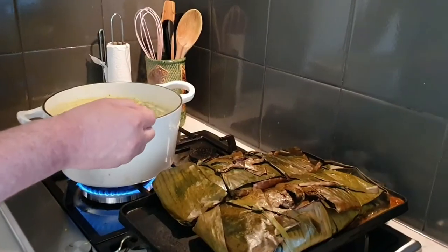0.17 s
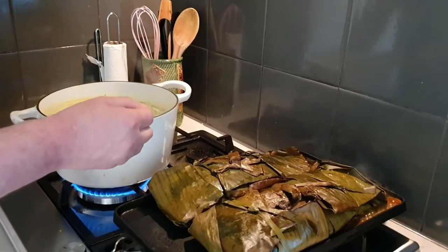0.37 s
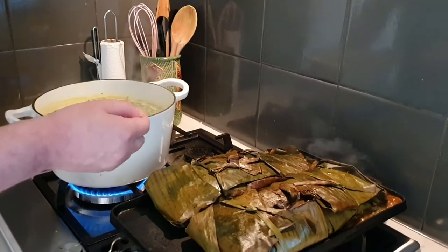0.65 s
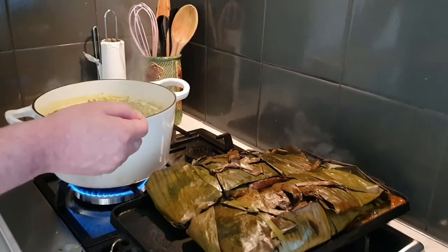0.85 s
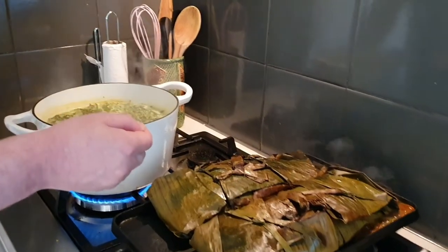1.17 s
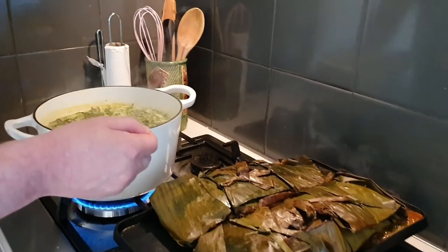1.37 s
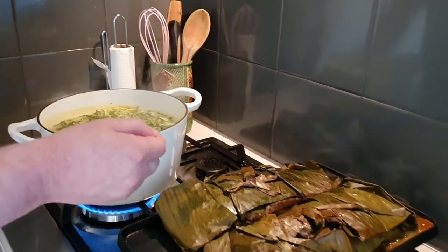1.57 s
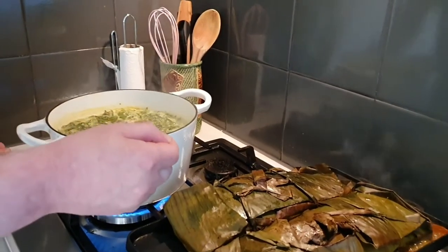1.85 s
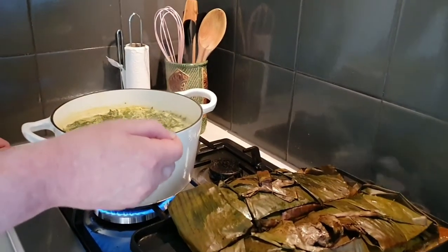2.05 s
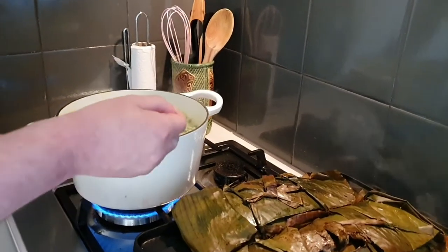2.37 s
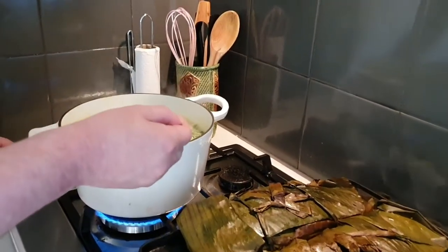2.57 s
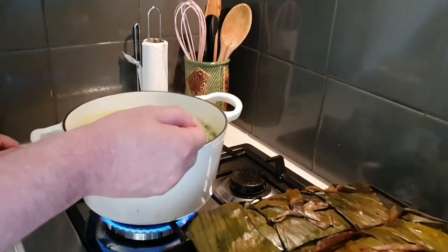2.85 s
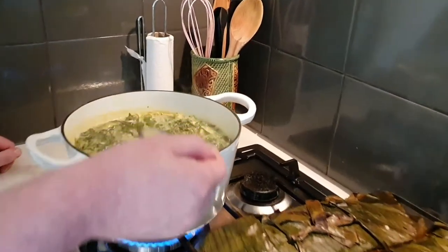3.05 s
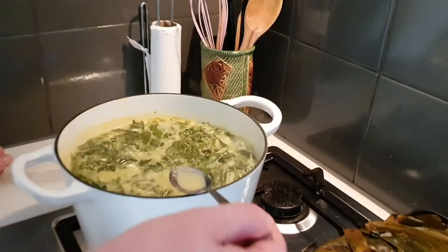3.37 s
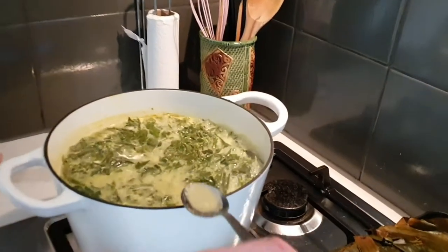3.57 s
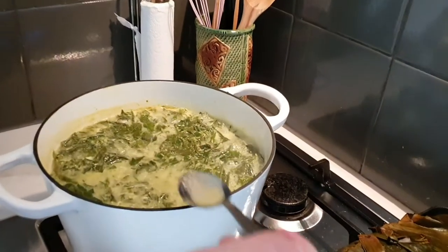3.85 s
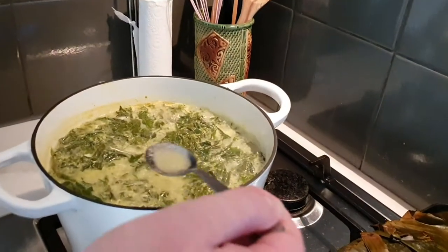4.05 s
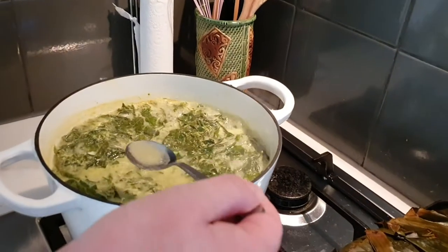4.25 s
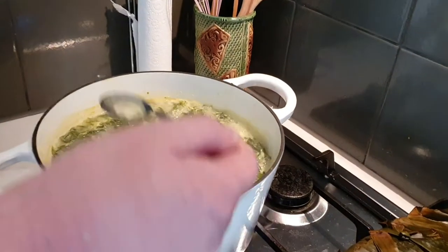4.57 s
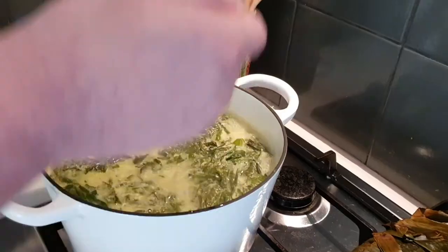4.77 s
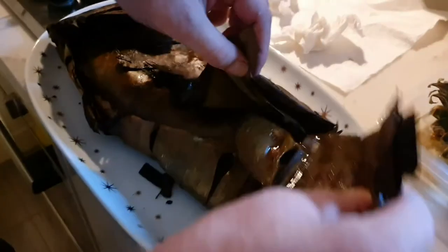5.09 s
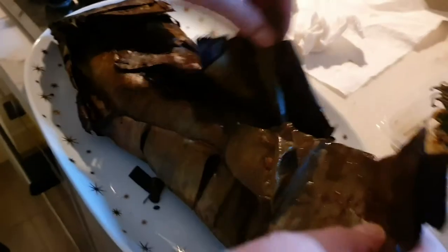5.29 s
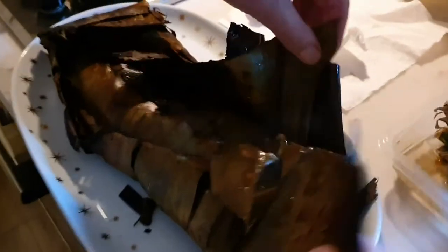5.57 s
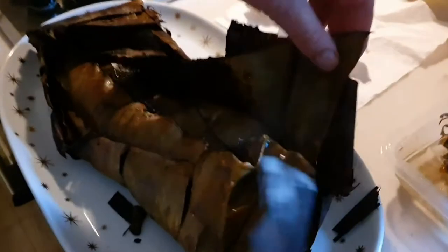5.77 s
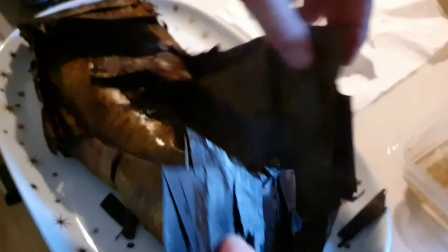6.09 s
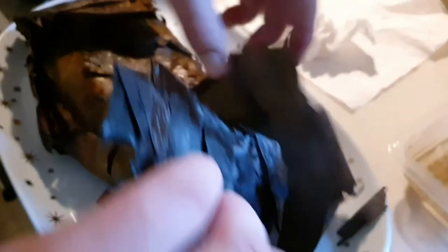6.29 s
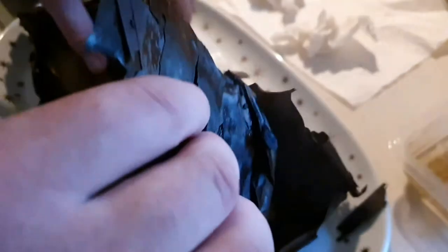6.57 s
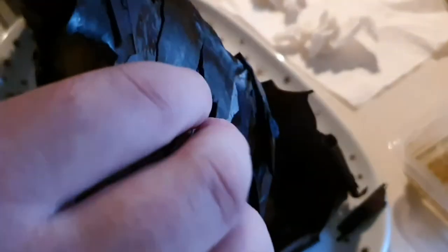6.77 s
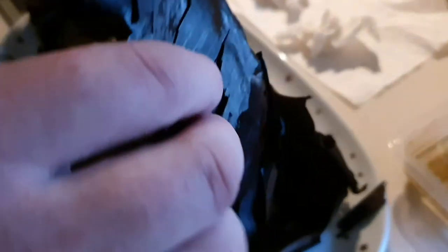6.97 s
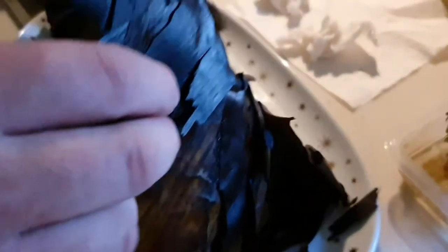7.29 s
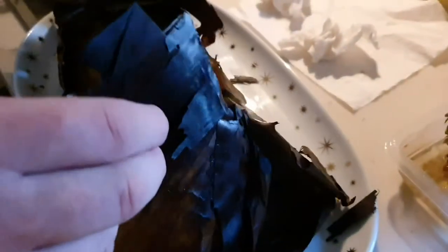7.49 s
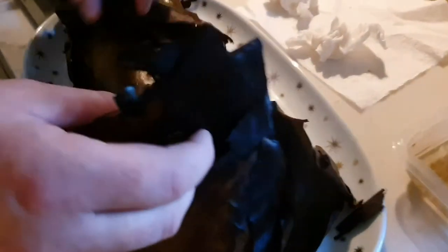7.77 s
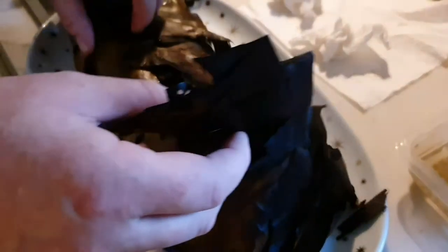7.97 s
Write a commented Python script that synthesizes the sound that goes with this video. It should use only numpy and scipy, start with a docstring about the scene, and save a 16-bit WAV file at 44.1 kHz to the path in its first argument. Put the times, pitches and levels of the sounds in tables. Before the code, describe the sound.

In a small tiled kitchen, a pot simmers softly over a gas flame. Close to the stereo microphones a hollow plastic bowl tumbles in quick bounces, slams hard, then rocks in ever faster, softer taps. The sizzle grows nearer, with light spoon ticks and a dull cupboard knock, then fades away. Fingers peel crisp baked leaves, crackling, scraping and snapping, close and slightly left.

```python
"""In a tiled kitchen, stew simmers over a gas flame: shaped noise for the flame, bursts of clicks for bubbles.
Near the pair of microphones something hollow, probably a plastic bowl, tumbles, slams down and wobbles to rest;
a spoon ticks and something like a cupboard door shuts, all as contact forces driving resonances. The kitchen
sounds fade to silence and the scene changes: fingers peel crisp baked leaves off a parcel of food: cracks,
slips and snaps, with a faint hum. Most of the sound sits a little to the left."""
import sys
import numpy as np
from scipy import signal
from scipy.fft import rfft, irfft, next_fast_len
from scipy.io import wavfile

SR = 44100
rng = np.random.default_rng(int(sys.argv[2]) if len(sys.argv) > 2 else 0)


def digitize_waveform(pressure):
    """Quantize a signal to 16-bit integers and store it at the path in sys.argv[1].

    Rows of a 2-D input are taken as channels; values are limited to [-1, 1].
    """
    field = np.atleast_2d(pressure).T
    bounded = np.clip(field, -1, 1)
    quanta = np.round(bounded * 32767).astype(np.int16)
    wavfile.write(sys.argv[1], SR, quanta)


N = 358533
TIME = np.arange(N) / SR

# Bowl bounces: t/s, body level/dB, boom f/Hz, boom level/dB, contact hardness/dB, treble ring f/Hz
BOUNCES = [(0.05, -46, 450, -72, 6, 5370), (0.613, -20.5, 300, -27, -3.5, 7140),
           (0.716, -20.5, 386, -26, -11.5, 7300), (0.789, -40.5, 332, -33, -2.5, 7140),
           (0.873, -22.5, 506, -28, -2.5, 10300), (0.907, -22, 441, -23.5, -2.5, 5330),
           (0.949, -34.5, 377, -50, -22, 5230), (1.071, -31, 290, -36, 11.5, 7700),
           (1.114, -31.5, 301, -31.5, -11.5, 5230), (1.204, -30, 331, -29, -2.5, 10330),
           (1.26, -28.5, 293, -36, 0, 5400), (1.343, -26, 319, -32, -7.5, 5440),
           (1.406, -28, 280, -27.5, -8.5, 5100), (1.577, -30.5, 310, -31, -9, 6420),
           (1.653, -30.5, 302, -28, -6.5, 6420)]
# Bowl resonances: f/Hz, width/Hz, level/dB
BOWL = [(292, 23, -13.5), (494, 110, -8), (687, 98, -7), (740, 48, -6.5), (1060, 540, -12), (1315, 88, -3),
        (1616, 180, -13), (2120, 140, -12), (2420, 85, -12.5), (3650, 3600, -20), (5090, 91, -8.5),
        (5960, 500, -31), (6200, 34, -11.5), (6900, 240, -16.5), (8000, 90, -27.5), (8870, 1400, -28.5),
        (10400, 400, -14.5), (11000, 400, -21.5), (12500, 1300, -27)]
# Resonances of the hard landing: f/Hz, width/Hz, level/dB
LANDING = [(80, 31, -1), (115, 95, -2.5), (188, 12, 12), (290, 71, 0), (409, 40, -3), (506, 39, -4),
           (700, 200, -10), (1190, 400, -5.5), (2400, 30, -12.5), (2616, 38, -4), (2850, 1800, -9),
           (3020, 78, -6), (3470, 17, -4), (3870, 410, -2), (4580, 58, -5), (5000, 34, -3),
           (5060, 1400, -13.5), (6570, 320, -6.5), (11700, 6400, -10)]
# Hard landing: level/dB of the boom, body, clack, click and top ranges
SLAM_DB = [-21.5, -22, -20.5, -18.5, -25]
# Range limits of the hard landing: f/Hz
SLAM_EDGES_HZ = [40, 400, 1000, 2800, 7500, 17000]
# Range limits of bounces, taps and knocks (boom, body, clack, click): f/Hz
BLOW_EDGES_HZ = [40, 400, 1000, 2800, 17000]
# First wobble tap, rows boom, body, clack, click: level/dB, loss/(dB per dB that the gap shrinks)
TAP_RANGES = [(-31.5, 0.7), (-34.5, 1.2), (-28, 2.5), (-36.5, 3)]
# Short rolls on the rim: t/s, length/s, boom f/Hz, boom level/dB, rattle level/dB
ROLLS = [(1.96, .11, 299.7, -38, -50), (2.126, 0.044, 297, -46, -54), (2.184, 0.13, 302.4, -37.5, -47),
         (2.391, 0.024, 303, -58, -62), (2.471, 0.066, 208.2, -44, -66)]
# Soft low bumps: t/s, level/dB, f/Hz
BUMPS = [(1.423, -27.5, 99.4), (3.639, -29.5, 65), (3.705, -37, 60), (6.343, -46.5, 51), (7.515, -43.5, 48)]

# Hands at the parcel, how busy: t/s, level/dB
HANDLING = [(4.84, -25), (5.07, -5), (5.3, -6.5), (5.48, -12), (5.8, -0.5), (6.15, -1), (6.7, 2),
            (7.85, 2.5), (8.13, -3.5)]
# A leaf is bent and crinkles: t/s, length/s, level/dB
BENDS = [(5.245, 0.036, -52), (5.8, .1, -50), (5.985, 0.031, -56), (6.35, 0.095, -59.5),
         (6.655, 0.068, -53), (6.93, 0.051, -54.5), (7.18, 0.053, -43), (7.555, 0.05, -45),
         (7.69, 0.087, -50), (7.88, 0.028, -69)]
# A leaf slides over the parcel: t/s, length/s, scrape level/dB, soft rub level/dB
SLIDES = [(5.517, 0.02, -59, -67), (5.809, 0.079, -65, -59), (6.247, .03, -66, -70), (6.334, .1, -71, -58),
          (6.612, 0.039, -51, -63), (6.85, 0.048, -49, -76), (7.205, 0.026, -38, -43),
          (7.527, 0.085, -48.5, -42.5), (7.642, 0.09, -51.5, -44), (8.121, .03, -52, -42)]
# Leaf fibres snapping: t/s, level/dB, brightness/dB, length of the tear/s
SNAPS = [(4.951, -60.5, -1, .002), (5.063, -52, -4.5, 0.0023), (5.2, -56, -4.5, 0.0018),
         (5.311, -48.5, -2.5, 0.0023), (5.559, -57, 0, .001), (5.655, -62.5, 7, 0.0015),
         (5.746, -49, 2.5, 0.0011), (5.823, -42.5, 2, 0.005), (6.007, -43.5, 0.5, 0.00029),
         (6.101, -54, 5, .003), (6.243, -52.5, -7.5, .001), (6.328, -60.5, -3, .002),
         (6.631, -58.5, 1, 0.00086), (6.682, -66, 8, .002), (6.755, -59.5, 7.5, 0.0028),
         (6.835, -52, 6.5, .001), (6.904, -49, 0, .002), (7.013, -50, 2, 0.0063), (7.105, -42, -2.5, 0.012),
         (7.173, -52, -9, 0.0018), (7.217, -51.5, -16, 0.0027), (7.477, -53, 1.5, 0.00065),
         (7.546, -51, -4, .002), (7.719, -38, -2.5, 0.00083), (7.834, -50.5, -2, .001),
         (7.897, -54.5, -7, 0.00055), (7.921, -63, 7, .001), (7.989, -61, -7, .001), (8.033, -55, -5, .001)]
# Balance of a snap in low, middle and top treble: level/dB
SNAP_BALANCE_DB = [-8.5, -0.5, -5.5]
# Range limits of snaps and spoon ticks: f/Hz
SNAP_EDGES_HZ = [600, 2800, 7500, 17000]
# Leaf resonances: f/Hz, width/Hz, level/dB
LEAF = [(1460, 560, -0.5), (2460, 700, -3), (3670, 440, 1), (6260, 770, -1.5), (10200, 3100, -8),
        (14900, 1600, -14)]
# Spectrum of leaves scraping: f/Hz, level/(dB per Hz)
SCRAPING = [(400, -12.5), (680, 5.5), (950, 5.5), (1300, 0), (1700, -4.5), (3000, -5.5), (7000, -26)]
# Spectrum of leaves rubbing softly: f/Hz, level/(dB per Hz)
RUBBING = [(100, -6), (150, 6), (220, -1), (350, 1), (560, -3.5), (800, -6), (2000, -42)]

# Cupboard door knocks: t/s, level/dB, boom level/dB
KNOCKS = [(4.12, -42.5, -61), (4.168, -29, -38.5)]
# Cupboard resonances: f/Hz, width/Hz, level/dB
CUPBOARD = [(126, 35, -3), (210, 79, -1), (366, 390, -9.5), (537, 190, -8.5), (835, 180, -13),
            (1140, 300, -12), (1770, 1350, -18), (3700, 1300, -51)]
# Spoon ticks: t/s, level/dB, ring f/Hz, brightness/dB
TICKS = [(3.267, -35, 3260, -2.5), (3.348, -59.5, 2900, -19), (3.601, -48.5, 2640, -11)]
# Balance of a tick in low, middle and top treble: level/dB
TICK_BALANCE_DB = [-5.5, -0.5, -3.5]
# Spoon resonances: f/Hz, width/Hz, level/dB
SPOON = [(1570, 610, -3), (2160, 200, -12), (3230, 390, -0.5), (4460, 440, 7), (5700, 290, 5),
         (9450, 4000, -21)]

# How near the stove is: t/s, level/dB
NEARNESS = [(0, -7.5), (.5, -4.5), (2.5, -5), (2.85, -2.5), (3.15, -0.5), (3.6, 1.5), (4.05, -2)]
# Spectrum of the gas flame: f/Hz, level/(dB per Hz)
FLAME = [(110, -26.5), (190, -2.5), (290, 4.5), (430, -3.5), (750, -1.5), (1000, -2.5), (1500, -23),
         (3000, -28)]
# Spectrum of the bubbling stew: f/Hz, level/(dB per Hz)
SIZZLE = [(700, -26.5), (1050, -3), (1400, 6.5), (1900, 0), (2500, -0.5), (3500, 2.5), (5500, 0),
          (8000, -4.5), (12500, -3.5), (16000, -12.5)]
# Spectrum of the low rumble of stove and hands: f/Hz, level/(dB per Hz)
RUMBLE = [(20, -36), (35, -5.5), (50, 4), (80, 3.5), (115, 2), (160, -9), (260, -45)]
# Faint electric hum: f/Hz, level/dB
HUM = [(393.0, -76.5)]
# Diffuse sound at the two microphones: f/Hz, likeness (1 alike, 0 unrelated)
LIKENESS = [(50, 1), (130, 0.97), (280, 0.91), (520, 0.72), (1000, 0.079), (3000, -0.076), (15000, -0.13)]

SLAM_S = 1.422
CLACK_DB, CLICK_DB = -3.5, -6   # against the body
CLACK_FOLLOWS = 0.32   # share of the hardness that reaches the clack
RING_WIDTH_HZ, RING_DB = 220, -13
FLEX_HZ, FLEX_RISE_HZ = 1279, 654.6   # where the chirp settles; how far above it starts
FLEX_SAG_S, FLEX_SWELL_S = .012, .016
FLEX_DB = -6.5   # against the level passed to each chirp
RIM_BOOM_BELOW_HZ = 325   # lower booms mark a landing on the rim
# Every gap between taps is a fixed share of the last
WOBBLE_START_S, FIRST_GAP_S, GAP_SHARE = 1.722, .055, .87
CYCLES_PER_TOUCH = 4
ATTACK_S, RELEASE_S = 0.011, 0.035   # of every stroke and roll
# Between the strokes, before HANDLING is added; the rumble has no strokes
CRINKLE_DB, SCRAPE_DB, RUB_DB, HAND_RUMBLE_DB = -61, -67, -64, -60
DOOR_CLACK_DB, DOOR_CLICK_DB = -5.5, -8.5   # against the knock
FLAME_DB, SIZZLE_DB, STOVE_RUMBLE_DB = -50, -48.5, -50   # before NEARNESS is added
SIZZLE_FOLLOWS = .75   # share of NEARNESS in dB that reaches the sizzle
KITCHEN_T60_S = 0.54
LEFT_LEAD_S = .00036   # direct sound reaches the left microphone first
MIC_SPREAD_S = .0006   # largest shift of an echo at either microphone
BOWL_LEFT_DB, OTHERS_LEFT_DB = 2.5, 3   # left over right
SILENT_AT_S, FADE_S, HANDS_FADE_IN_S = 4.82, 0.69, 0.038   # stove fades out, then the parcel fades in
CUTOFF_HZ = 16300


def bowl():
    """The bowl bounces, booming at a pitch set by how it lands, and slams down."""
    bounces = []
    for s, body_db, boom_hz, boom_db, hard_db, ring_hz in BOUNCES:
        clack_db = body_db + CLACK_DB + CLACK_FOLLOWS * hard_db
        click_db = body_db + CLICK_DB + hard_db
        modes = [(boom_hz, 45, 1.5)] + BOWL + [(ring_hz, RING_WIDTH_HZ, RING_DB)]
        bounces.append(blow(s, [boom_db, body_db, clack_db, click_db], modes, BLOW_EDGES_HZ,
                            contact_s=0.007, chatter=3.5, room_db=2.5, near_db=-1.5,
                            lead_s=LEFT_LEAD_S, scatter_db=1.0))
    slam = blow(SLAM_S, SLAM_DB, LANDING, SLAM_EDGES_HZ, contact_s=0.018, chatter=6.4, room_db=0.0,
                near_db=-3.0, lead_s=LEFT_LEAD_S, scatter_db=1.5, size=SR // 14)
    chirps = [flex(s, body_db) for s, body_db, boom_hz, *_ in BOUNCES if boom_hz < RIM_BOOM_BELOW_HZ]
    return blows(bounces) + blows(chirps) + blows([slam])


def wobble(count=10):
    """The bowl rocks on its rim in ever quicker, softer and duller taps."""
    gaps = FIRST_GAP_S * GAP_SHARE ** np.arange(count)
    starts = WOBBLE_START_S + np.cumsum(gaps) - gaps
    first_db, loss = np.transpose(TAP_RANGES)
    shrink_db = 20 * np.log10(gaps / FIRST_GAP_S)
    taps = list(zip(starts, first_db + loss * shrink_db[:, None]))
    modes = [(287, 45, 2.1)] + BOWL + [(6400, 64, -4)]
    knocks = blows(blow(s, levels_db, modes, BLOW_EDGES_HZ, contact_s=0.018, chatter=0.66, room_db=0.5,
                        near_db=-9.5, lead_s=LEFT_LEAD_S, scatter_db=3.5) for s, levels_db in taps)
    return knocks + blows(flex(s, clack_db + 9.5) for s, (_, _, clack_db, _) in taps)


def roll(s, length_s, boom_hz, boom_db, rattle_db):
    """The rim touches down every few cycles of the boom, keeping it going with a light rattle."""
    t = TIME[:SR // 2]
    touches = np.diff(np.floor(t * boom_hz / CYCLES_PER_TOUCH), prepend=-1) * stroke(t, length_s)
    boom_force = kitchen(touches, room_db=-3.0, near_db=1.0, lead_s=LEFT_LEAD_S)
    boom = resonate(boom_force, [(boom_hz, 40, 0)], scatter_db=0)
    rattle_force = kitchen(touches, room_db=1.0, near_db=11.0, lead_s=LEFT_LEAD_S)
    rattle = resonate(rattle_force, BOWL, scatter_db=7.0)
    parts = [(boom_db, band(boom, [150, 430])), (rattle_db, band(rattle, [520, 1350]))]
    size = int((length_s + RELEASE_S) * SR)
    return round(s * SR), sum(from_db(db) * part / part[:, :size].std() for db, part in parts)


def flex(s, db):
    """A landing on the rim stiffens the wall for a moment: its pitch falls as it springs back."""
    t = TIME[:SR // 8]
    hz = FLEX_HZ + FLEX_RISE_HZ * np.exp(-t / FLEX_SAG_S)
    hz = hz * from_db(.2 * rng.standard_normal())   # each landing a shade off in pitch
    swell = (t / FLEX_SWELL_S) ** 2 * np.exp(2 - 2 * t / FLEX_SWELL_S)
    cycles = np.cumsum(hz) / SR + rng.random((2, 1)) / 2   # a phase of its own at each microphone
    return round(s * SR), from_db(db + FLEX_DB) * swell * np.sin(2 * np.pi * cycles)


def bumps():
    """Soft low bumps, as sine waves that swell and die within a few cycles."""
    t = TIME[:SR // 3]
    swell = (t / 0.021) ** 2 * np.exp(2 - 2 * t / 0.023)
    return blows((round(s * SR), from_db(db) * swell * np.sin(2 * np.pi * hz * t)[None])
                 for s, db, hz in BUMPS)


def leaves():
    """Dry leaves rub and scrape as they slide, and crack in clumps as they bend, over a handling rumble."""
    busy = from_db(curve_db(HANDLING))
    crinkle = strokes(BENDS, from_db(CRINKLE_DB) * busy)
    scrape = strokes([(s, length_s, db) for s, length_s, db, _ in SLIDES], from_db(SCRAPE_DB) * busy)
    rub = strokes([(s, length_s, db) for s, length_s, _, db in SLIDES], from_db(RUB_DB) * busy)
    bending = from_db(0.95 * drift(30))
    cracks = 0
    for modes in (LEAF[:2], LEAF[2:4], LEAF[4:]):   # large and small flakes crack in clumps of their own
        clicks = grains(260 * bending * from_db(8.1 * drift(45)), spread_db=6.5)
        cracks = cracks + resonate(kitchen(clicks, room_db=5.0, near_db=1.0, lead_s=0), modes, scatter_db=0)
    slips = grains(1200 * from_db(6.2 * drift(40)), spread_db=4.0)
    slips = kitchen(slips, room_db=0.0, near_db=7.5, lead_s=0)
    friction = diffuse(N)
    rumble = from_db(HAND_RUMBLE_DB) * busy * colour(friction, RUMBLE)
    rubbing = colour(friction[:, ::-1], RUBBING)   # reversed, to be unlike the rumble
    return crinkle * rms_one(cracks) + scrape * colour(slips, SCRAPING) + rub * rubbing + rumble


def snaps():
    """Single fibres snap, each at its own pitch."""
    sounds = []
    for s, db, bright_db, tear_s in SNAPS:
        pitch = from_db(rng.uniform(-1.6, 2.4))   # frequency ratio, 0.83 to 1.32
        sounds.append(blow(s, db + tilted(SNAP_BALANCE_DB, bright_db), np.array(LEAF) * [pitch, 1, 1],
                           SNAP_EDGES_HZ, contact_s=tear_s, chatter=7.2, room_db=-2.0, near_db=-2.0,
                           lead_s=0, scatter_db=-1.0))
    return blows(sounds)


def utensils():
    """Dull cupboard knocks from across the room and light ticks of the spoon."""
    knocks = blows(blow(s, [boom_db, db, db + DOOR_CLACK_DB, db + DOOR_CLICK_DB], CUPBOARD, BLOW_EDGES_HZ,
                        contact_s=0.0023, chatter=1.0, room_db=10.5, near_db=-5.5,
                        lead_s=LEFT_LEAD_S, scatter_db=1.0, size=SR // 16)
                   for s, db, boom_db in KNOCKS)
    ticks = blows(blow(s, db + tilted(TICK_BALANCE_DB, bright_db), [(ring_hz, 90, 3.0)] + SPOON,
                       SNAP_EDGES_HZ, contact_s=.004, chatter=0.75, room_db=5.5, near_db=6.5,
                       lead_s=0, scatter_db=3.0)
                  for s, db, ring_hz, bright_db in TICKS)
    dull = signal.butter(2, 5500, fs=SR, output="sos")
    return signal.sosfilt(dull, knocks) + ticks


def stove():
    """The flame rumbles and rushes under thousands of tiny bursting bubbles."""
    near_db = curve_db(NEARNESS)
    bubbles = grains(3000 * from_db(2.5 * drift(23)), spread_db=5.5)
    bubbles = kitchen(bubbles, room_db=6.5, near_db=-2.0, lead_s=0)
    rush = from_db(FLAME_DB) * colour(diffuse(N), FLAME)
    rumble = from_db(STOVE_RUMBLE_DB) * colour(diffuse(N), RUMBLE)
    sizzle = from_db(SIZZLE_DB + SIZZLE_FOLLOWS * near_db) * colour(bubbles, SIZZLE)
    return from_db(near_db) * (rush + rumble) + sizzle


def hum():
    """An appliance hums faintly, a steady sine, near the worktop where the parcel lies."""
    present = np.interp(TIME, [4.84, 5.3], [0, 1])
    return present * sum(from_db(db) * rms_one(np.sin(2 * np.pi * hz * TIME)) for hz, db in HUM)


def blow(s, levels_db, modes, edges, contact_s, chatter, room_db, near_db, lead_s, scatter_db,
         size=SR // 50):
    """A click and a brief chatter drive the modes; each range's level is set over the first `size` samples."""
    t = TIME[:SR * 2 // 5]
    force = chatter * rng.standard_normal(len(t)) * np.exp(-t / contact_s) / np.sqrt(contact_s * SR / 2)
    force[0] += 1
    ringing = resonate(kitchen(force, room_db, near_db, lead_s), modes, scatter_db)
    ringing = tiles(ringing, echo_db=-15.0)
    parts = [band(ringing, pair) for pair in zip(edges, edges[1:])]
    return round(s * SR), sum(from_db(db) * part / part[:, :size].std() for db, part in zip(levels_db, parts))


def resonate(force, modes, scatter_db):
    """Parallel resonances; each point of contact excites them a little differently."""
    out = 0
    for k, (hz, width, level_db) in enumerate(modes):
        r = np.exp(-np.pi * width / SR)
        gain = (-1) ** k * from_db(level_db + scatter_db * rng.standard_normal()) * (1 - r * r) / 2
        poles = [1, -2 * r * np.cos(2 * np.pi * hz / SR), r * r]
        out = out + signal.lfilter([gain, 0, -gain], poles, force + 1e-18)
    return out


def kitchen(force, room_db, near_db, lead_s):
    """Direct sound, then diffuse sound following its energy: quick near reflections and the tiled room's tail."""
    energy = 0
    for t60, level_db in [(.05, near_db), (KITCHEN_T60_S, room_db)]:
        r = from_db(-120 / (t60 * SR))   # this energy falls 60 dB in t60
        energy = energy + signal.lfilter([0, 1 - r], [1, -r], (from_db(level_db) * force) ** 2 + 1e-18)
    late = np.pad(force, (int(abs(lead_s) * SR), 0))[:len(force)]
    return np.array([force, late]) + np.sqrt(energy) * diffuse(len(force))


def tiles(x, echo_db, count=6):
    """A few early echoes off tiles and worktop, each from its own direction, colour every blow in its own way."""
    out = x.copy()
    delays = rng.uniform(.001, .009, count) + MIC_SPREAD_S * rng.uniform(-1, 1, (2, count))
    for channel, lags in enumerate(np.maximum(delays * SR, 1).astype(int)):
        for k, lag in enumerate(lags):
            out[channel, lag:] += (-1) ** k * from_db(echo_db) * x[channel, :-lag]
    return out


def diffuse(size):
    """White stereo noise from all around: alike in the bass, nearly unrelated in the treble."""
    padded = next_fast_len(size)
    mid, side = rfft(rng.standard_normal((2, padded)))
    alike = np.clip(per_bin(LIKENESS, padded), -.99, .99)
    stereo = np.sqrt(1 + alike) * mid + np.sqrt(1 - alike) * side * [[1], [-1]]
    return irfft(stereo, padded)[:, :size]


def grains(per_s, spread_db):
    """Random clicks, mostly small and a few large."""
    sizes = from_db(spread_db * np.minimum(rng.exponential(1, N), 4)) * rng.choice([-1, 1], N)
    return sizes * (rng.random(N) < per_s / SR)


def drift(per_s):
    """Slow chance: straight lines between normal random values, `per_s` of them a second."""
    return np.interp(TIME * per_s, np.arange(4096), rng.standard_normal(4096))


def stroke(t, length_s):
    """Rise, hold, then die away."""
    return np.clip(t / ATTACK_S, 0, 1) * np.exp(-np.maximum(t - length_s, 0) / RELEASE_S)


def strokes(rows, between):
    """Gain of strokes (t/s, length/s, level/dB), their power added to that of the gain between them."""
    t = TIME[:SR // 2]
    power = blows((round(s * SR), (from_db(db) * stroke(t, length_s))[None] ** 2) for s, length_s, db in rows)
    return np.sqrt(between ** 2 + power[0])


def blows(sounds):
    """Lay out sounds at their starting samples."""
    out = np.zeros((2, N))
    for at, sound in sounds:
        out[:, at:at + sound.shape[1]] += sound[:, :N - at]
    return out


def colour(x, spectrum):
    """Weight a sound by a smooth spectrum; rms 1."""
    size = next_fast_len(N)
    shaped = rfft(x, size) * from_db(per_bin(spectrum, size))
    return rms_one(irfft(shaped, size)[..., :N])


def per_bin(points, size):
    """A table over log frequency, read at the bins of a transform."""
    hz, value = np.transpose(points)
    return np.interp(np.log(np.fft.rfftfreq(size, 1 / SR) + 1), np.log(hz), value)


def band(x, edges):
    """Keep one range of frequencies."""
    return signal.sosfilt(signal.butter(3, edges, "band", fs=SR, output="sos"), x)


def tilted(balance_db, brightness_db):
    """Brightness raises the top of three ranges and lowers the bottom one."""
    return np.array(balance_db) + brightness_db * np.array([-1, 0, 1])


def curve_db(points):
    """A level curve at every sample."""
    return np.interp(TIME, *np.transpose(points))


def from_db(db):
    """Decibels to gain."""
    return 10 ** (np.asarray(db) / 20)


def rms_one(x):
    """Scale to unit power."""
    return x / np.sqrt(np.mean(x ** 2) + 1e-20)


def placed(x, left_db):
    """All but the deep bass sits a little to the left."""
    bass = signal.sosfiltfilt(signal.butter(2, 90, fs=SR, output="sos"), x)
    return bass + (x - bass) * from_db(left_db / 2 * np.array([[1], [-1]]))


def scene():
    """The bowl clatters by the stove; stove and utensils fade out, then the leaves are unwrapped."""
    clatter = placed(bowl() + wobble() + blows(roll(*row) for row in ROLLS), BOWL_LEFT_DB)
    fade_out = np.clip((SILENT_AT_S - TIME) / FADE_S, 0, 1)
    cooking = fade_out * (utensils() + stove())
    fade_in = np.clip((TIME - SILENT_AT_S) / HANDS_FADE_IN_S, 0, 1)
    unwrapping = fade_in * (leaves() + snaps() + hum())
    return clatter + placed(cooking + unwrapping, OTHERS_LEFT_DB) + bumps()


def record(dry):
    """The highest peaks are rounded and the top is cut steeply."""
    rounded = 1.1 * np.tanh(dry / 1.1)
    return signal.sosfilt(signal.ellip(10, .1, 90, CUTOFF_HZ, fs=SR, output="sos"), rounded)


dry = scene()
out = record(dry)
digitize_waveform(out)
```